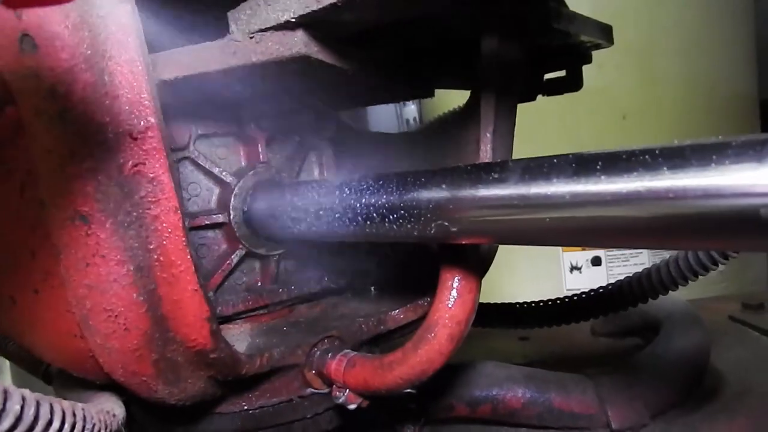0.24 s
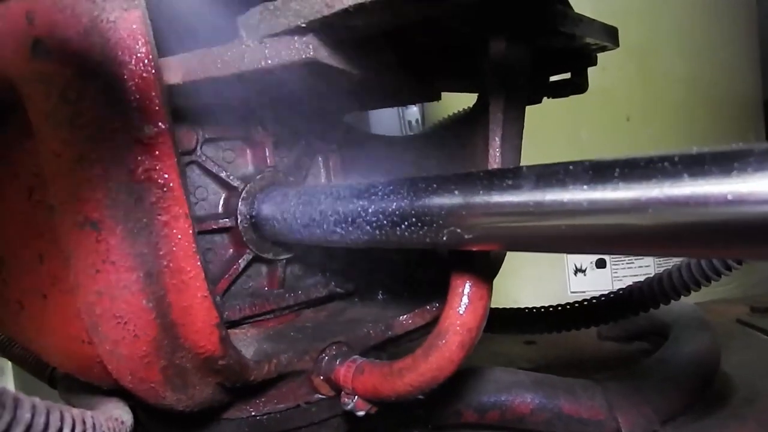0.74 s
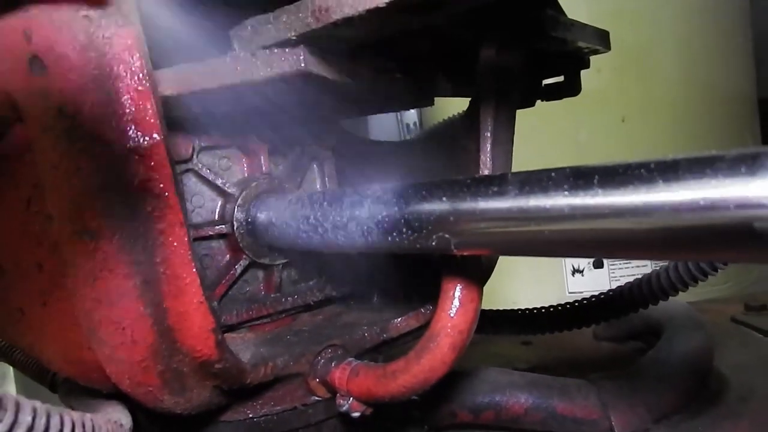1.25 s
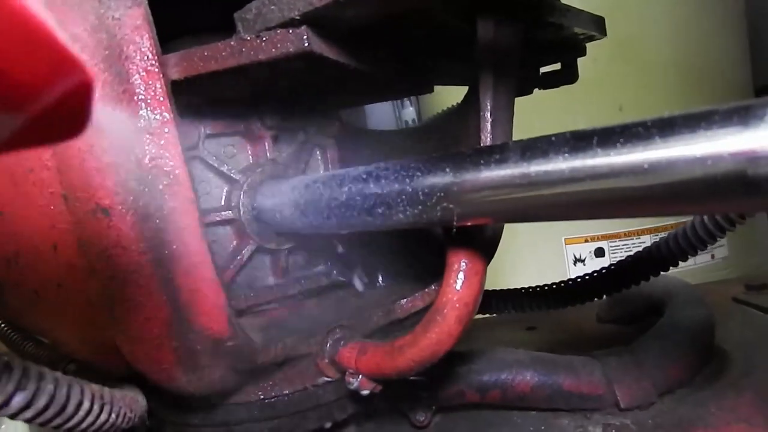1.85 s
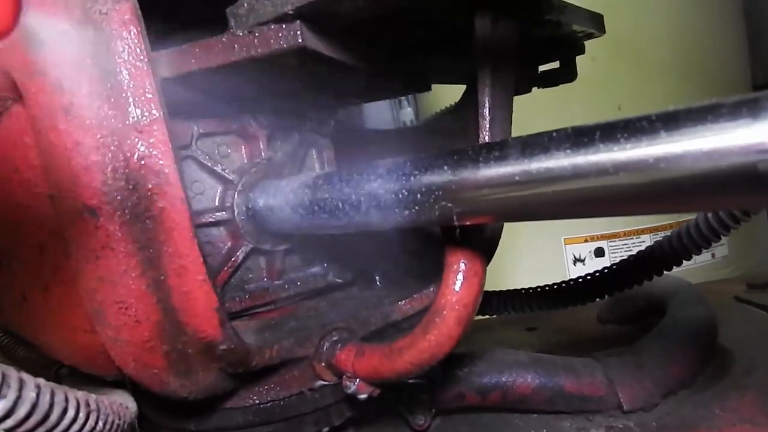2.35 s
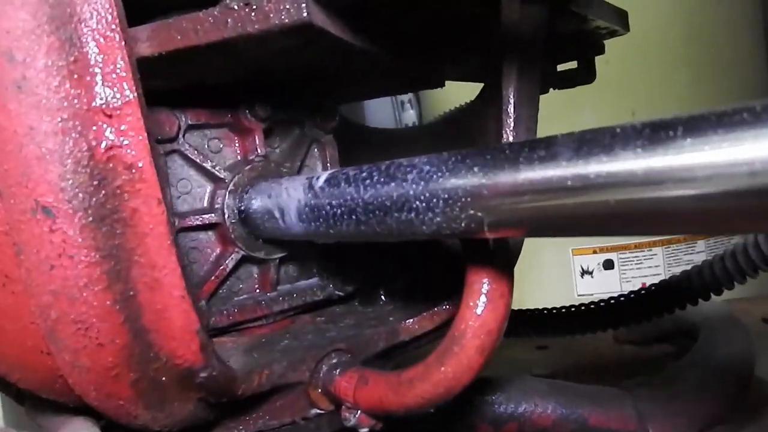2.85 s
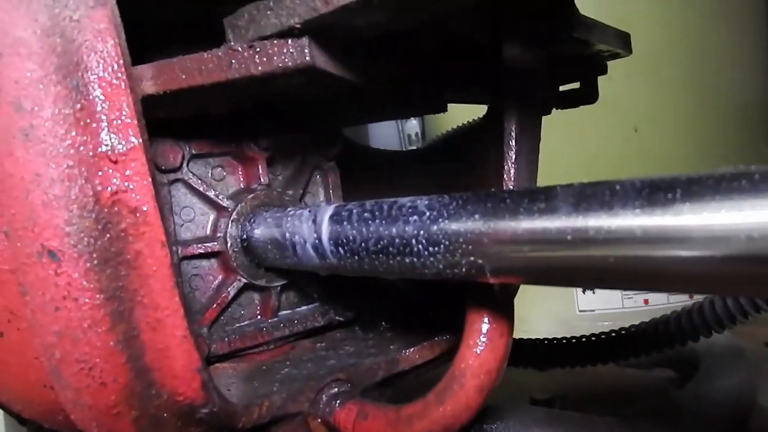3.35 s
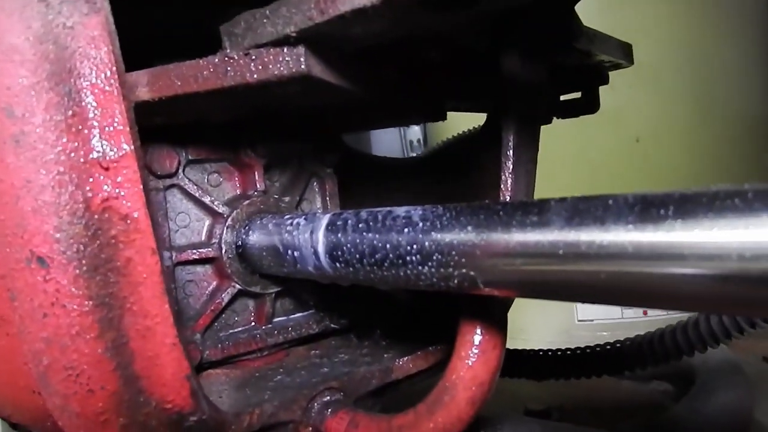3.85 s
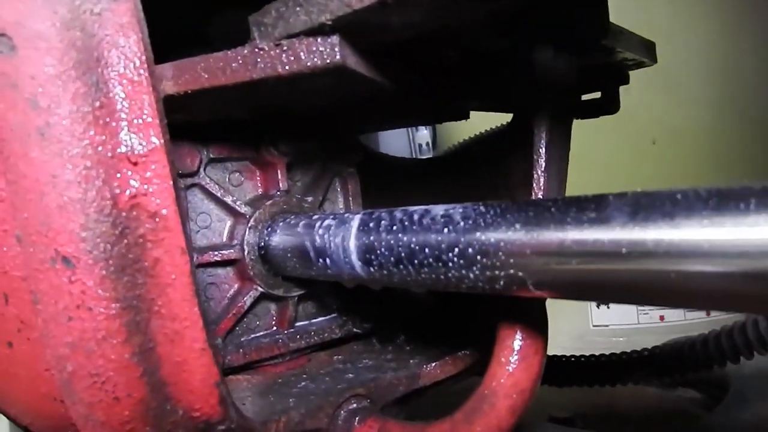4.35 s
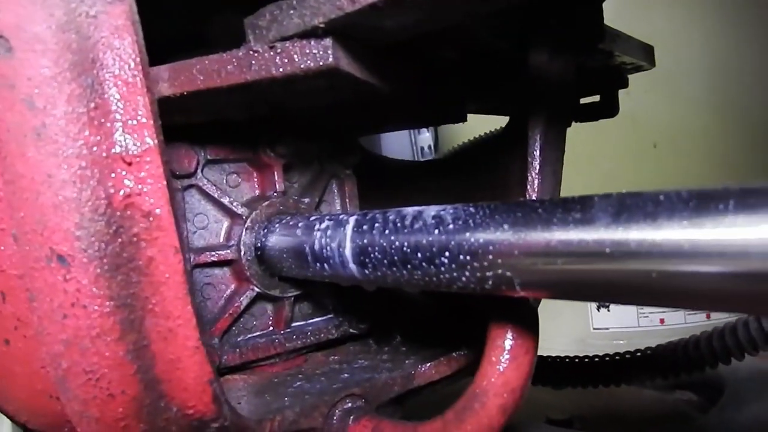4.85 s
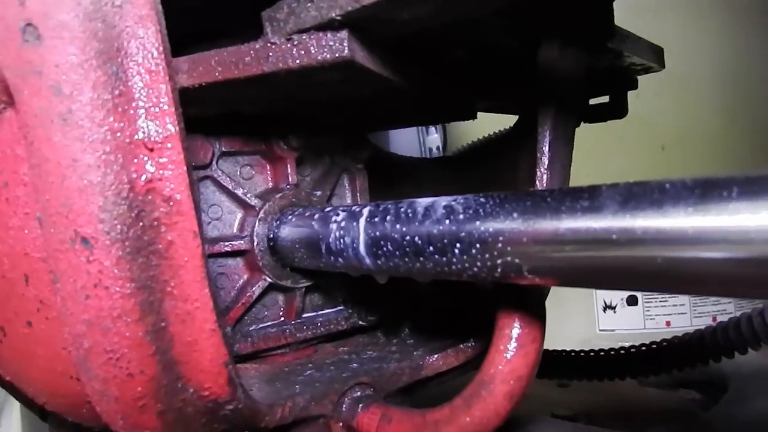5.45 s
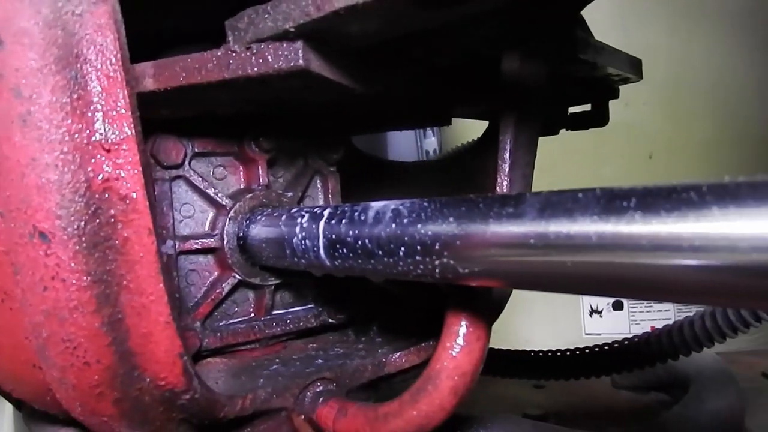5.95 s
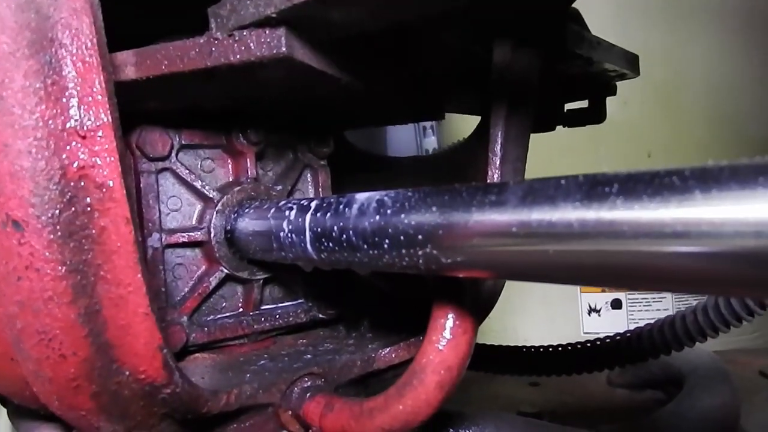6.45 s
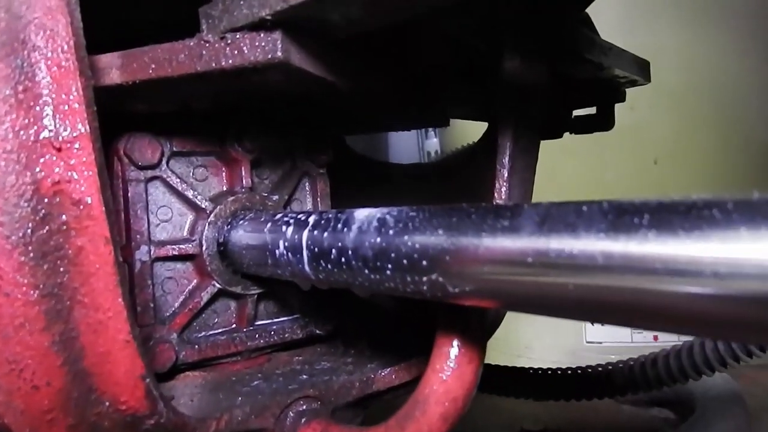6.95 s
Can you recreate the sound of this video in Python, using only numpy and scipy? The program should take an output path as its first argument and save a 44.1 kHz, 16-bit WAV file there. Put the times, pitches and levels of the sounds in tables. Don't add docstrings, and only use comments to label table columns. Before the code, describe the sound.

Compressed air hisses hard and steadily from a leaking shaft seal up close, with sputtering spray and dull knocks, then cuts to a more distant hiss.

```python
import sys
import numpy as np
from scipy import signal
from scipy.fft import rfft, irfft, next_fast_len
from scipy.io import wavfile

SR = 44100
rng = np.random.default_rng(int(sys.argv[2]) if len(sys.argv) > 2 else 0)


def boost_factor(decibels):
    exponent = np.asarray(decibels, float) / 20
    return 10 ** exponent


def file_out(sig):
    cols = np.atleast_2d(sig).T
    lim = np.clip(cols, -1, 1)
    pcm = np.round(lim * 32767).astype(np.int16)
    wavfile.write(sys.argv[1], SR, pcm)


N = 317712
SIZE = next_fast_len(N)
HZ = np.arange(SIZE // 2 + 1) * SR / SIZE + 1e-3
CUT_S = 7.1038


def in_time(rows):
    s, *columns = np.transpose(rows)
    return [np.interp(np.arange(N) / SR, s, column) for column in columns]


def in_pitch(rows):
    hz, *columns = np.transpose(rows)
    return [np.interp(np.log(HZ), np.log(hz), column) for column in columns]


def waveform(spectrum):
    return irfft(spectrum, SIZE)[..., :N]


def unit_mid(x):
    return x / np.sqrt(np.mean(x.mean(axis=0) ** 2) + 1e-20)


def drift(rate):
    r = np.exp(-80 * np.pi * rate / SR)
    settle = 2000
    slow = signal.lfilter([1], [1, -2 * r, r * r], rng.standard_normal(N // 40 + settle + 2))[settle:]
    return np.interp(np.arange(N) / 40, np.arange(len(slow)), slow / slow.std())


def port_noise(likeness_scale):
    # pitch in Hz, left over right in dB, likeness 0-1, lead of the right in radians.
    ports = [(250, .8, .98, .02), (700, .4, .98, .02), (1500, -.2, .988, -.06), (2800, 1.7, .982, .17),
             (4500, 3.4, .965, .42), (5300, .5, .8, .86), (5900, -3.5, .55, 1.57), (6600, -4.4, .4, 2.71),
             (7250, -3, .3, .13), (7700, -.5, .92, .12), (8900, -.6, .9, .47), (9600, -2.2, .33, 1.12),
             (10300, -2.3, .25, .11), (11100, .1, .93, 0), (13000, 0, .87, 0)]
    balance_db, alike, lead = in_pitch(ports)
    alike = np.clip(alike * likeness_scale, 0, 1)
    white = rng.standard_normal((2, N))
    shared, own = rfft(np.pad(white, [(0, 0), (0, SIZE - N)], "wrap"))
    right = (alike * shared + np.sqrt(1 - alike ** 2) * own) * np.exp(1j * lead)
    return np.array([shared * boost_factor(balance_db / 2), right * boost_factor(-balance_db / 2)])


def leak():
    # time in seconds, posture number 0-2.
    lean = [(0, 0), (2.4, .05), (3.0, .97), (5.3, 1.03), (6.1, 1.95), (7.2, 2)]
    # time in seconds, swing of the hiss in dB.
    pressure = [(0, -0.5), (.3, 0.5), (.7, 0.4), (1.0, -0.6), (1.3, 0.6), (1.9, 0.95), (2.2, 1.0),
                (2.45, -.2), (2.8, -0.1), (3.15, -0.5), (3.6, -0.14), (4.2, -0.7), (4.9, -0.45), (5.35, .9),
                (5.7, 0.4), (6.15, -0.2), (6.75, 1.0), (7.1, 0.8)]
    # time in seconds, swing in dB.
    narrowing = [(0, -0.5), (.7, 0.3), (.95, -1.5), (1.6, -0.5), (2.1, 0), (3.2, -1), (4.7, 1), (5.35, 1),
                 (5.85, 1.2), (6.1, -0.2), (7.1, 0)]
    narrowing_share = [-0.043, -0.063, -.1, 0.93, -0.02]
    # level in dB, share of pressure swing, share of spurt,
    # extra dB in the second posture, extra dB in the third.
    ranges = [
        (-33.5, 0.68, 0.19, -0.46, -0.11),
        (-24, 0.9, .1, -0.074, .1),
        (-24.5, 0.54, 1.16, -1.06, -1.1),
        (-28, .7, 0.17, 0.14, 0.24),
        (-38.5, 1.2, 0.092, 0.28, 0.24),
    ]
    posture = np.clip(in_time(lean)[0], 0, 2)
    noise = port_noise(1)
    heard = 0
    for k, gain in enumerate(surroundings()):
        nearness = np.clip(1 - abs(posture - k), 0, 1)
        heard = heard + nearness * waveform(noise * gain)
    heard = rfft(heard, SIZE)
    below = [0] + [1 / (1 + (HZ / hz) ** 24) for hz in (1800, 3100, 4200, 5600)] + [1]
    flutter_db = -0.07 * drift(19)
    pressure_db, narrowing_db, spurt_db = in_time(pressure)[0], in_time(narrowing)[0], spurts_db()
    out = 0
    for k, (level_db, pressure_share, spurt_share, *lean_db) in enumerate(ranges):
        level_db = level_db + pressure_share * pressure_db + spurt_share * spurt_db
        level_db = level_db + narrowing_share[k] * narrowing_db
        level_db = level_db + np.interp(posture, range(3), [0] + lean_db)
        waver_db = 0.53 * drift(12)
        band = waveform(heard * (below[k + 1] - below[k]))
        out = out + unit_mid(band) * boost_factor(level_db + flutter_db + waver_db)
    return out * np.clip((CUT_S - np.arange(N) / SR) / .0008, 0, 1)


def surroundings():
    # pitch in Hz, level in dB per Hz.
    jet = [(40, -49), (130, -32), (300, 0.5), (520, -6), (1200, -15.5), (1900, -22.5), (2500, -15.5),
           (4500, -12.5), (5800, -25.5), (7300, -29), (8700, -24.5), (10400, -36.5), (12800, -34.5),
           (15600, -57)]
    # pitch in Hz, width in Hz,
    # dB in the first posture, dB in the second, dB in the third.
    frame = [(176, 25, 5.5, 5.5, 5), (226, 45, -14.5, -19, -21), (290, 32, -10.5, -9.5, -7.5),
             (307.5, 512, -26.5, -27.5, -27), (424, 45, -11.5, -9, -12), (496.4, 37, 7.5, 7.5, 6.5),
             (533, 32, -5.5, -6, -4.5), (723.5, 89, -6.5, -9.5, -9), (751, 48, 7, 10, 8),
             (805, 52, -5.5, -3, -5), (847, 19, 6, 0.5, 5.5), (1011, 27, -15, -8, -13),
             (1046, 74, 7, 8.5, 7), (1098.5, 99, -18.5, -26, -24)]
    # pitch in Hz, width in Hz, dB in the first
    # posture, dB in the second, dB in the third.
    parts = [(1210, 31, 3.5, 4.5, 1), (1305, 18, -7.5, -6.2, -6), (1357, 138, 7, 7.5, 8),
             (1606, 49, -5.5, -7, -3.5), (1864, 49, -8, -14.5, -13), (1958, 510, 12, 14, 12.5),
             (2415, 125, 12.5, 11.5, 9.5), (2550, 58, 5.1, 11, 7), (2640, 27, 11, 6.5, 0.5),
             (2711, 45, 0, 2.5, 4.1), (2754, 25, 2, 13, 9), (2862, 82, 14.5, 12.5, 16),
             (2983, 26, 11.5, 14, 10.5), (3110, 18, -4, -9, -6),
             (3120, 17, 5, 11, 7), (3340, 18, -14, -3, -13), (3260, 46, 0.5, 0, -1),
              (3405, 430, 12, 9, 9.5), (3664, 107, -9.5, 4, 2.5), (3650, 45, 10, 3, 2.1),
              (3693, 28, 14.5, -8, -12), (3822, 36, 7, 10.5, 12.5), (3955, 156, 9, 8.5, 7),
              (4035, 42, -1, -8, -4), (4130, 117, -2, 6.5, 4), (4288, 37, 9.5, -2, 4),
             (4477, 107, 7.5, 9, 8), (4565, 69, -9, -15.5, -10), (4615, 120, 6.5, 13, 9.5),
            (4920, 40, 8.5, 10, 8), (5050, 34, 8, 5, 10.5), (5162, 85, 8, 11, 9.5), (5250, 27, 1, -2, -4),
            (5320, 34, 7, 11, 8), (5430, 41, 7, 6.5, -1), (5550, 47, 8.5, 0, 5), (5672, 34, -5, 10, 10),
            (5840, 69, 9.5, 8, 4), (6230, 100, 3, 9, 5),
             (6740, 69, 6, -7, 2), (6850, 313, 3.5, 5.5, 2.5), (6840, 71, -13, -2, -0.2),
            (7460, 157, 2.2, -3, -1), (7800, 176, 4.5, 3.5, 1), (8150, 115, -4, 3, -1.7),
            (8080, 370, 0.5, -7.5, -3.5), (8440, 270, -3, 3, 3), (8920, 117, 4.5, 3.5, 2),
            (9100, 60, 6, 0, -1),
             (9518, 700, -0.4, -2, -3), (9781, 104, 0, 2, 0.2), (10000, 700, -2, 3, -0.4),
              (10357, 64, 3.2, 0.9, 0.1), (10700, 193, 3, -4, -4), (11180, 274, 2.7, 6.5, 7.5),
              (11531, 206, -2, 2, 4), (11900, 418, 7, 4, 5), (11980, 182, -5.1, -7.6, -3.9),
              (12796, 700, 0, -0.5, -1), (12926, 125, 1.9, 1.9, 1.7), (13330, 700, -2, -1, 0.2)]
    coarse_hz, modes_db = HZ[::16], 0
    for hz, width, *level_db in frame + parts:
        resonance = 1 / (1 + (2 * (coarse_hz - hz) / width) ** 2)
        modes_db = modes_db + np.outer(level_db, resonance)
    colour_db = in_pitch(jet)[0] + np.array([np.interp(HZ, coarse_hz, row) for row in modes_db])
    treble = 1 / (1 + (4200 / HZ) ** 3)
    ripple_db = [scatter_db(t60=0.039, depth=0.57) for _ in colour_db]
    return boost_factor(colour_db + treble * ripple_db)


def scatter_db(t60, depth):
    t = np.arange(SR // 10) / SR
    echoes = rng.standard_normal(len(t)) * boost_factor(-60 * t / t60)
    echoes = echoes / np.sqrt(np.sum(echoes ** 2))
    power = np.abs(1 + depth * rfft(echoes, SIZE)) ** 2
    return 10 * np.log10(power / power.mean() + 1e-3)


def spurts_db():
    # time in seconds, spurt in dB.
    spurts = [(.3, -1), (.6, 2.5), (.86, -0.5), (1.165, 2.5), (1.37, 1.5), (1.64, 2.5), (1.93, 0.5),
              (2.245, 3), (2.515, 4.5), (2.95, 0.2), (5.5, 0), (6.34, 2), (6.69, 2.5), (6.98, 2)]
    spurt_s, choke_s, choke_share = .035, 0.13, 0.52
    t = np.arange(0, N / SR, 1 / 500)
    s, level_db = np.transpose(spurts)[:, :, None]
    swell = (1 + choke_share) * np.exp(-((t - s) / spurt_s) ** 2)
    choke = choke_share * np.exp(-((t - s) / choke_s) ** 2)
    return np.interp(np.arange(N) / SR, t, np.sum(level_db * (swell - choke), axis=0))


def slide():
    # time in seconds, pitch in Hz, level in dB.
    glide = [
        (2.35, 12700, -75),
        (2.55, 12500, -54),
        (2.85, 12000, -48),
        (3.1, 11500, -52),
        (3.3, 11300, -75),
    ]
    hz, level_db = in_time(glide)
    lowpass = signal.butter(2, 300, fs=SR, output="sos")
    wobble = signal.sosfilt(lowpass, rng.standard_normal((2, N)))
    phase = 2 * np.pi * np.cumsum(hz) / SR
    carried = wobble[0] * np.cos(phase) + wobble[1] * np.sin(phase)
    return carried / wobble.std() * boost_factor(level_db)


def knocks():
    # start in seconds, peak in dB, pitch in Hz, t60 in seconds, undertone share 0-1.
    bumps = [(.87, -32.5, 496, .23, 0.16), (.924, -28, 547, 0.11, 0.1), (.94, -51, 257, .3, .05),
             (1.27, -45, 335, .4, 0.2), (1.43, -36, 534, .14, 0.4), (1.45, -52, 270, 0.22, 0.4),
             (2.383, -39, 316, 0.12, 0.5), (2.609, -36, 369, 0.13, 0.44), (4.126, -38, 312, .13, .44),
             (5.168, -42, 310, 0.22, 0.2), (5.23, -48, 256, .2, .05), (5.28, -48, 290, .12, .05),
             (5.31, -42, 260, 0.22, 0), (5.372, -47, 290, .11, .05), (5.508, -45, 305, 0.19, 0.14)]
    out, t = np.zeros(N), np.arange(SR // 4) / SR
    for s, peak_db, hz, t60, under in bumps:
        ring = np.sin(2 * np.pi * hz * t) + under * np.sin(2 * np.pi * .75 * hz * t)
        swell = 1 - np.exp(-(t / (0.038 * t60)) ** 2)
        i = round(s * SR)
        out[i:i + len(t)] += boost_factor(peak_db) * ring * swell * boost_factor(-60 * t / t60)
    return out


def far_leak():
    # time in seconds, level in dB.
    fade = [
        (7.104, -76),
        (7.114, -64),
        (7.1185, -37),
        (7.1235, -35),
        (7.126, -28),
        (7.15, -30),
        (7.2, -29),
    ]
    # pitch in Hz, level in dB per Hz.
    far_colour = [(90, -70), (200, -48), (445, -19), (1700, -18), (2150, -5), (2900, -7), (3450, -2),
                  (4800, -6), (5600, -24), (7000, -25), (8300, -17), (10600, -23), (11500, -33),
                  (15600, -34)]
    white = port_noise(0.97)
    hiss = unit_mid(waveform(white * boost_factor(in_pitch(far_colour)[0]))) * boost_factor(in_time(fade)[0])
    dull = white / (1 + (HZ / 4300) ** 14) / (1 + (500 / HZ) ** 3)
    remnant = unit_mid(waveform(dull)) * boost_factor(-54)
    return (hiss + remnant) * (np.arange(N) >= CUT_S * SR)


def scene():
    return leak() + slide() + knocks() + far_leak()


def band_limit(x):
    return signal.sosfilt(signal.butter(12, 15730, fs=SR, output="sos"), x)


def record(dry):
    thin = signal.sosfilt(signal.butter(2, 85, "high", fs=SR, output="sos"), dry)
    return band_limit(thin)


dry = scene()
out = record(dry)
file_out(out)
```